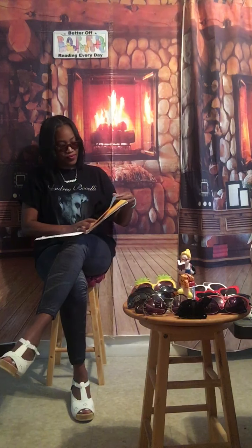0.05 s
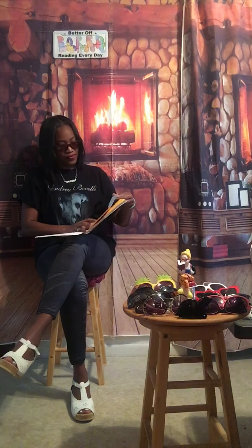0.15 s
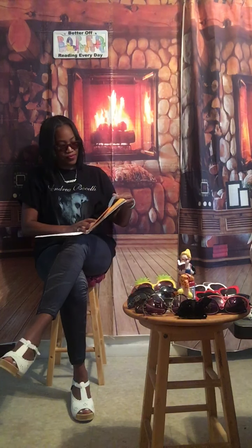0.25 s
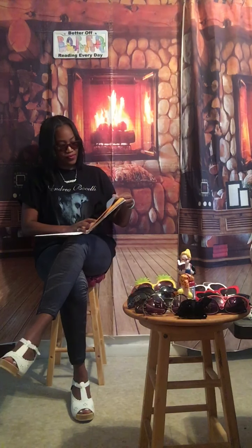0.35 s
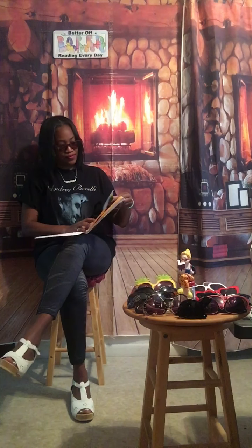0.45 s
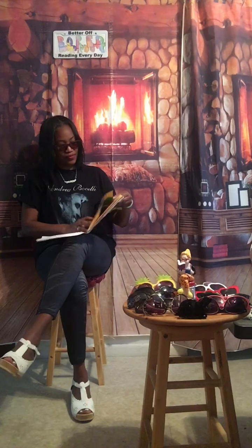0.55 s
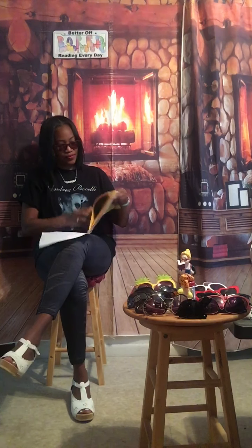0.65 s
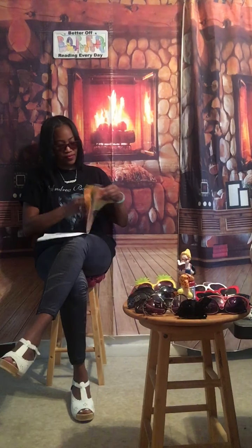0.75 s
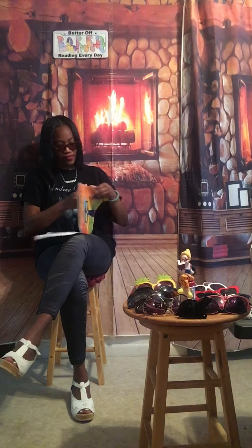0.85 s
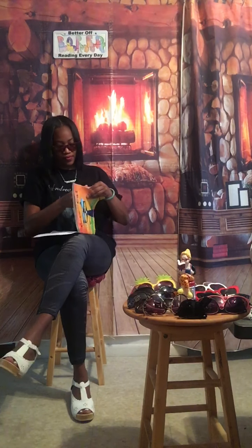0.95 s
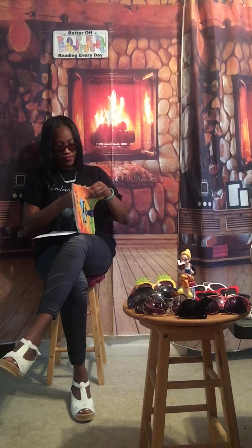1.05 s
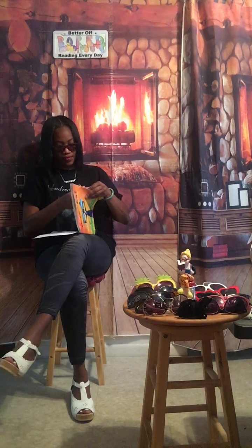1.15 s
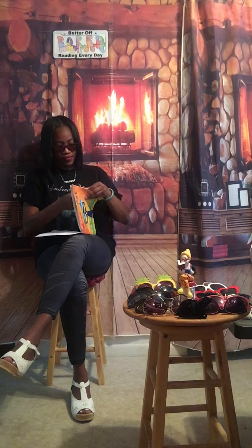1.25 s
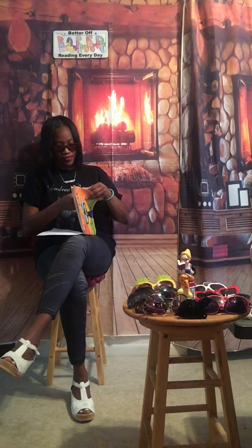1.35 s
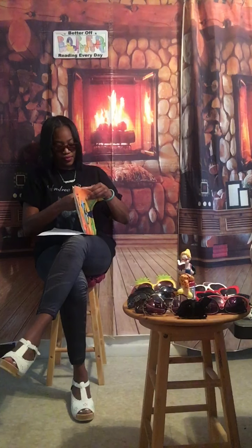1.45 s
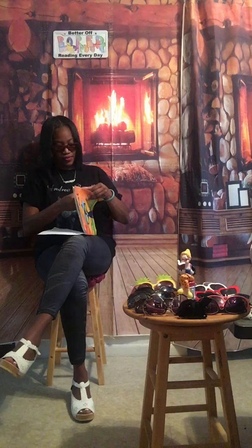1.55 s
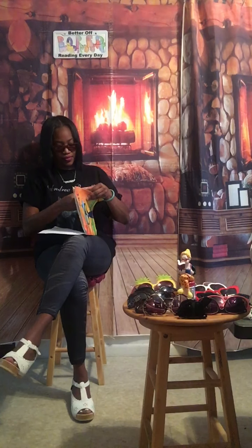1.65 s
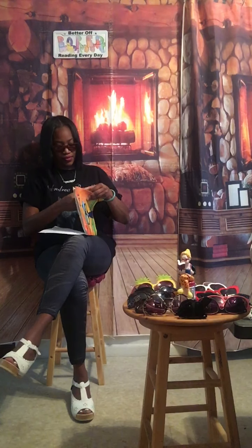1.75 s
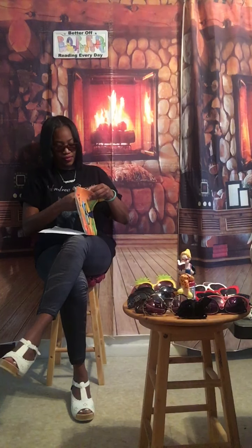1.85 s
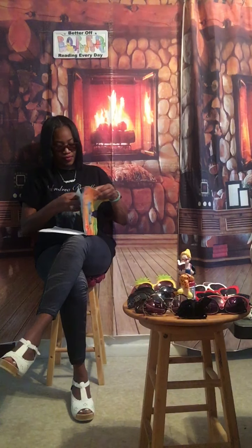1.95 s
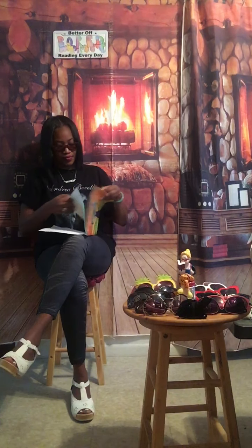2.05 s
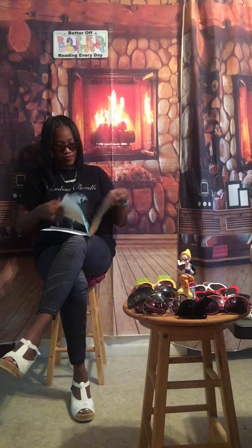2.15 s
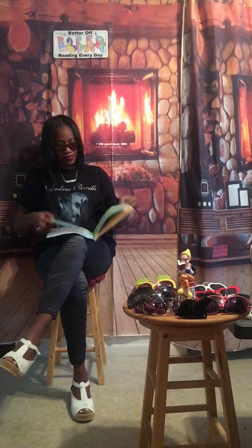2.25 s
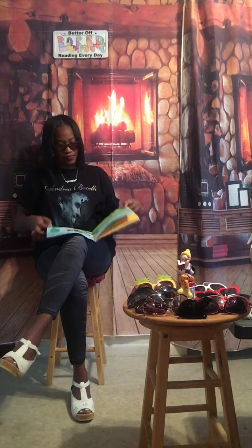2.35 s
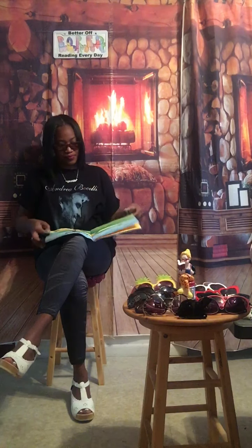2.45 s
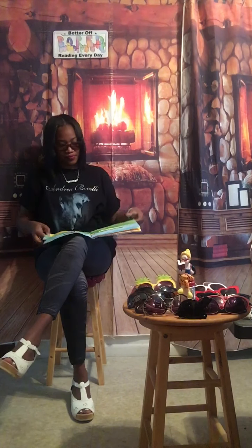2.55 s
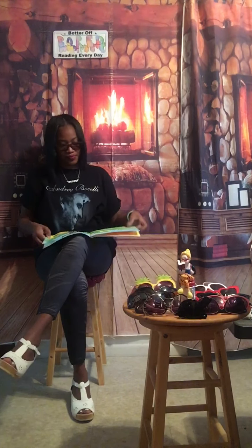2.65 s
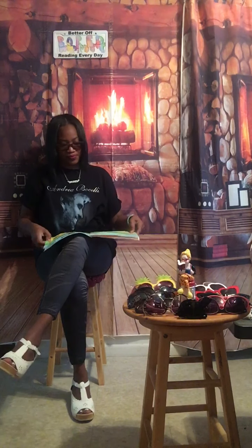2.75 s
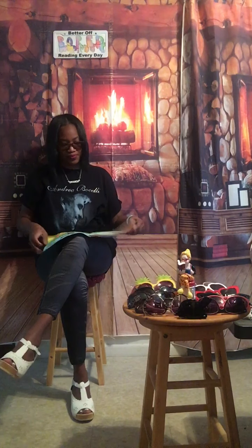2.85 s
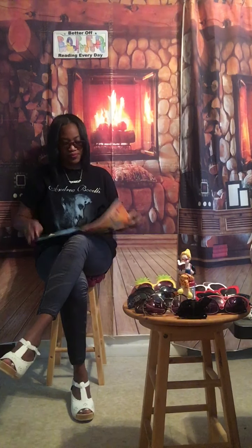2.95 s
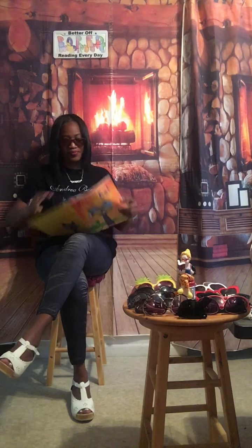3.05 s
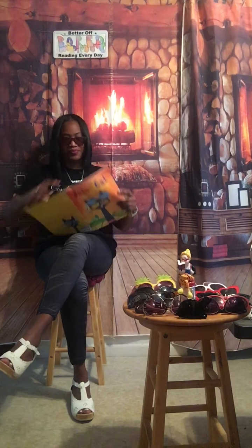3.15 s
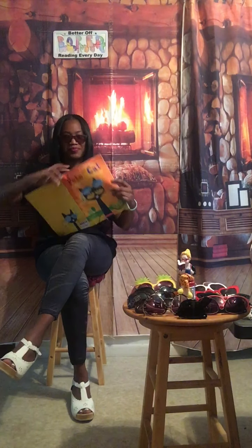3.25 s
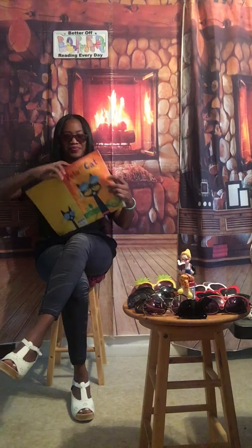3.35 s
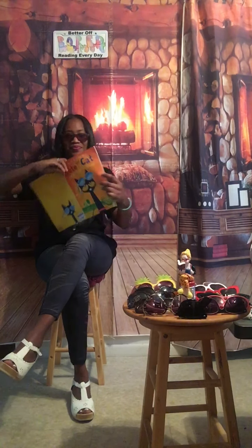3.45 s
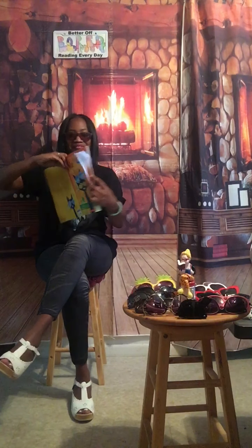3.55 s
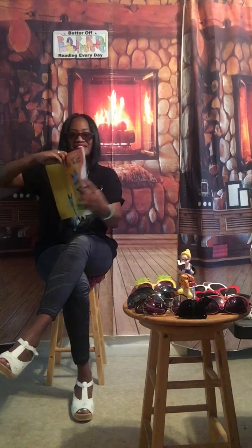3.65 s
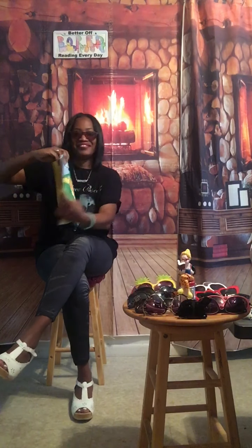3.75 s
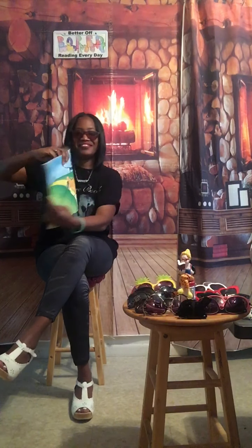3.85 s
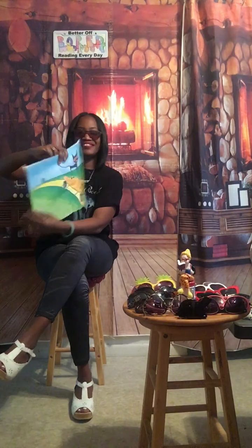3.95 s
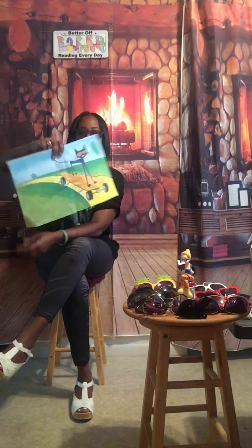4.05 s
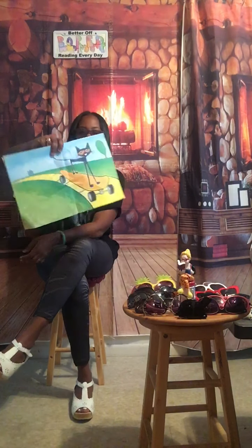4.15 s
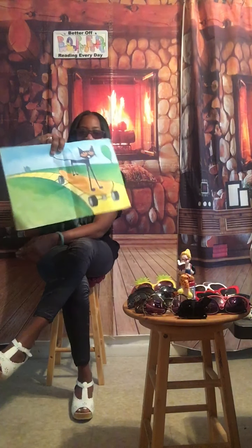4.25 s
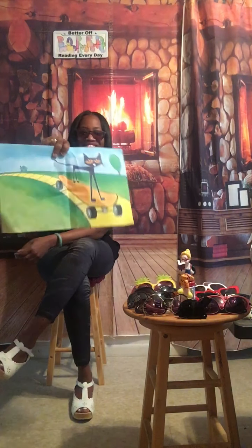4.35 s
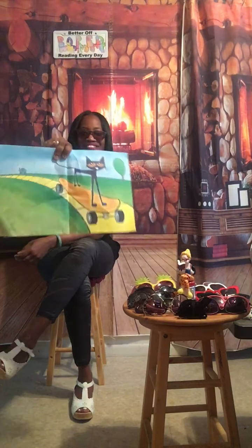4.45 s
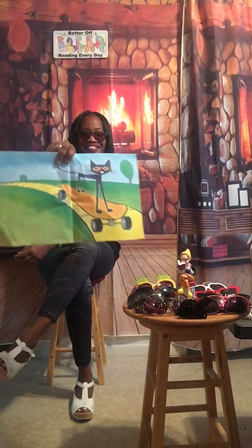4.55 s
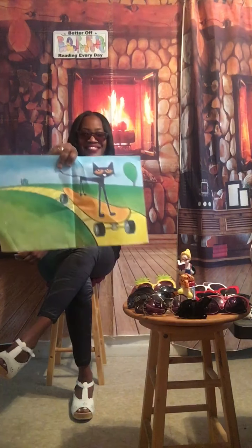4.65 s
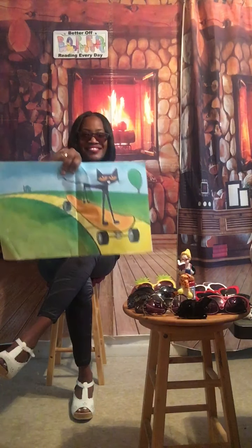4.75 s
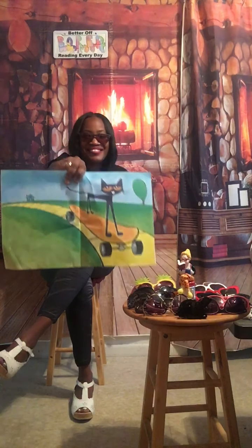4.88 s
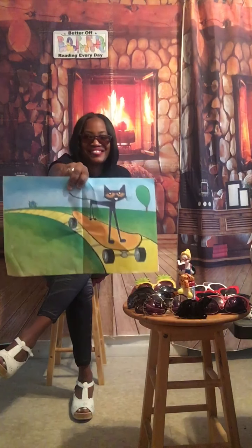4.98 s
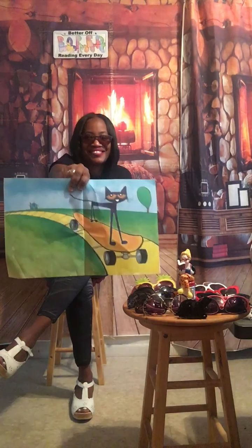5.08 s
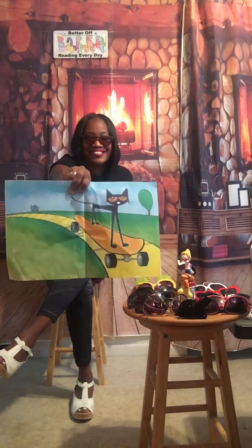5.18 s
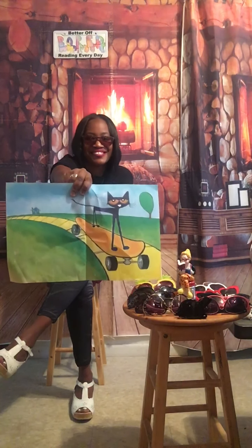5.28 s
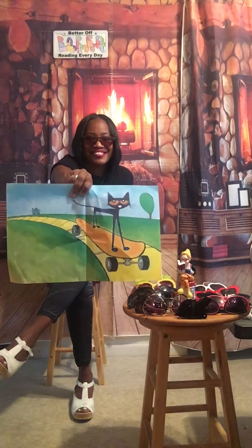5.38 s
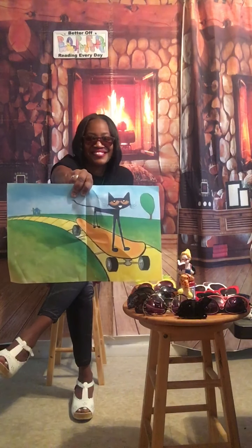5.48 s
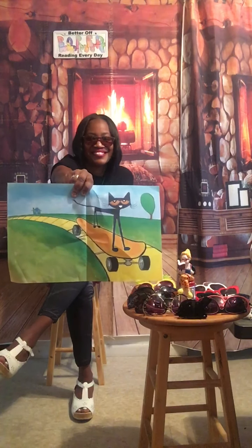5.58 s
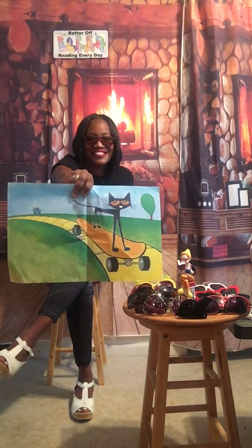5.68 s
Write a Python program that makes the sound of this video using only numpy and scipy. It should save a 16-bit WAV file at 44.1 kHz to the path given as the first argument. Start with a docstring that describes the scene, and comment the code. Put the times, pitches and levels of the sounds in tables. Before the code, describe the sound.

A large picture book is leafed through and handled in a small quiet room. Sheets slide with a soft, grainy rustle and buckle in short, crisp snaps. After a brief lull, a busier run of flicks and flops follows, then more sliding and light knocks of the cover as the book is folded open. The handling stops, leaving the low ventilation rumble, electrical hum and faint hiss that the microphone picks up throughout.

```python
"""A large picture book is leafed through, spread on the lap and folded open to be held up.
Sheets slide with a grainy rustle, buckle in short snaps and flop against the cover, which thuds.
Both rustle and snaps are swarms of tiny fibre slips. The walls of a small quiet room answer briefly;
ventilation rumble, mains hum and a faint hiss of air lie underneath."""
import sys
import numpy as np
from scipy import signal
from scipy.fft import rfft, irfft
from scipy.io import wavfile

SR = 44100
rng = np.random.default_rng(int(sys.argv[2]) if len(sys.argv) > 2 else 0)


def dump(signal):
    """Clip the signal to [-1, 1] and save it as 16-bit WAV at the path in sys.argv[1]."""
    limited = np.clip(np.atleast_2d(signal).T, -1, 1)
    pcm = np.round(limited * 32767).astype(np.int16)
    wavfile.write(sys.argv[1], SR, pcm)


N = 252242
T = np.arange(N) / SR


def undb(db):
    """Decibels to gain."""
    return 10 ** (np.asarray(db) / 20)


def unit(x):
    """Scale to rms 1."""
    return x / np.sqrt(np.mean(x ** 2))


def bins_hz(size):
    """FFT bin frequencies, floored at 1 Hz."""
    return np.maximum(np.arange(size // 2 + 1) * SR / size, 1)


def on_log_axis(points, hz):
    """Interpolate (Hz, value) points over log frequency."""
    points_hz, values = np.transpose(points)
    return np.interp(np.log(hz), np.log(points_hz), values)


def colour(x, spectrum):
    """Filter by (Hz, dB) points; rms 1."""
    return unit(irfft(rfft(x) * undb(on_log_axis(spectrum, bins_hz(N))), N))


def gain_curve(levels):
    """(s, dB) points to gain per sample."""
    return undb(np.interp(T, *np.transpose(levels)))


def drift(rate_hz):
    """Random drift with a spread near 1."""
    return np.interp(T * rate_hz, np.arange(2048), rng.standard_normal(2048))


def ventilation():
    """Ventilation rumbles in the low room modes."""
    # Rumble spectrum. Each row: frequency in Hz, relative level in dB.
    spectrum = [(25, -36), (44, -20), (58.5, 10.5), (66, -12), (71.5, 3), (74, 13.5), (77.5, 8), (84, -6.5),
                (93, -7), (103, 0), (114, -24), (150, -46)]
    # Rumble loudness. Each row: time in seconds, level in dB.
    levels = [(0.0, -55.5), (0.17, -54.5), (0.86, -60.5), (1.16, -56), (1.97, -63), (2.53, -53),
              (2.85, -60.5), (3.18, -57.5), (3.22, -60.5), (4.08, -57.5), (4.51, -58.5), (4.7, -56.5),
              (5.45, -62.5), (5.72, -59)]
    return gain_curve(levels) * colour(rng.standard_normal(N), spectrum)


def air_hiss(level_db=-67):
    """Faint steady hiss of the air."""
    # Noise floor. Each row: frequency in Hz, relative level in dB.
    spectrum = [(50, -18.5), (133, -15), (170, -21), (320, -20.5), (480, -25.5), (800, -30.5),
                (1150, -29.5), (2000, -33.5), (3100, -34.5), (4400, -37), (4800, -46), (5500, -38.5),
                (7000, -42.5), (7700, -50), (9500, -48), (10400, -62), (11500, -53), (15500, -72)]
    return undb(level_db) * colour(rng.standard_normal(N), spectrum)


def motor_hum(waver_db=3.0, beat_hz=2.3, beat_dip_s=5.14, second_db=-6.5):
    """A motor hums on the mains harmonics; a second, slightly slower, beats against its lowest line."""
    # Hum lines. Each row: frequency in Hz, relative level in dB.
    lines = [(119.8, 2.5), (239.6, -19), (359.4, -18), (408.8, -39), (479.2, -29), (958.4, -25.5)]
    # Hum loudness. Each row: time in seconds, level in dB.
    levels = [(0, -55), (.28, -57), (.6, -61.5), (2.5, -63.5), (2.9, -60), (5.72, -60)]
    rad_per_hz = 2 * np.pi * (T - beat_dip_s)
    first = sum(undb(db) * np.sin(hz * rad_per_hz) * undb(waver_db * drift(22)) for hz, db in lines)
    second = -np.sqrt(2) * np.sin((lines[0][0] - beat_hz) * rad_per_hz)
    return gain_curve(levels) * unit(unit(first) + undb(second_db) * second)


def fibre_slips(per_s, spread_db, size=N):
    """Paper fibres slip at random moments: many faint impulses, a few strong."""
    happens = rng.random(size) < per_s / SR
    strength = undb(spread_db * np.minimum(rng.exponential(size=size), 4))
    return happens * rng.choice([-1, 1], size) * strength


def slip_click(size=1024):
    """Click of one paper slip, coloured by the microphone's treble dips."""
    # Click spectrum, microphone dips included. Each row: frequency in Hz, gain in dB.
    spectrum = [(110, -22.5), (310, -6), (620, -1.5), (810, -3), (1250, 1.5), (3100, 1.5), (4650, -0.5),
                (6100, -0.5), (7700, -7.5), (9400, -4), (10400, -10.5), (12400, -4), (15900, 4)]
    cepstrum = irfft(np.log(undb(on_log_axis(spectrum, bins_hz(size)))))
    cepstrum[1:size // 2] *= 2  # fold to minimum phase
    cepstrum[size // 2 + 1:] = 0
    return irfft(np.exp(rfft(cepstrum)))


def ring(x, hz, q):
    """One damped resonance; rms 1."""
    return unit(signal.lfilter(*signal.iirpeak(hz, q, fs=SR), x))


def snap(crumple_ms, edge_hz, sheet_hz, cover_hz, cover_db, sheet_db=-4.0, size=8192):
    """A sheet buckles: an avalanche of slips swells and dies, ringing the sheet and the cover."""
    age = 1000 * np.arange(size) / SR / crumple_ms  # in crumpling times
    swell = np.minimum((age + 0.014) / 0.19, 1)
    burst = fibre_slips(per_s=14000, spread_db=1.6, size=size) * swell * np.exp(-age)
    crack = signal.fftconvolve(burst, slip_click())[:size]
    crack = unit(signal.lfilter(*signal.butter(3, edge_hz, fs=SR), crack))
    sheet = undb(sheet_db) * ring(crack, sheet_hz, q=3.5)
    cover = undb(cover_db) * ring(crack, cover_hz, q=5.5)
    return unit(crack + sheet + cover) * np.sqrt(0.004 * SR / size)  # energy of 4 ms at rms 1


def page_snaps():
    """Pages snap, flop and tap against the cover."""
    # Snaps. Each row: start in seconds, level in dB, crumpling time in ms, treble edge in Hz,
    # sheet resonance in Hz, cover resonance in Hz, cover level in dB re the crack.
    events = [ (0.3103, -54, 5.3, 2310, 2030, 306, -6), (0.459, -55, 16, 7540, 2800, 410, -18),
              (0.4863, -49.5, 20, 2670, 2030, 460, -30), (0.5626, -53.5, 9.4, 6400, 1690, 520, -20),
              (0.7763, -33, 5.6, 5600, 2300, 480, -34), (1.775, -55, 5.6, 1960, 1180, 420, -30),
              (1.8289, -33.5, 15.5, 10100, 1980, 420, -26), (1.9682, -43, 3.7, 3900, 2260, 530, -20),
              (2.04, -33, 3.5, 8600, 1820, 515, -24), (2.0449, -33, 4.5, 9900, 1270, 525, -11),
              (2.2087, -35.5, 12.5, 2750, 1330, 470, -18), (2.2430, -32, 10.2, 1690, 1170, 600, -3),
              (2.2560, -34.5, 7.3, 1910, 1100, 577, -17), (2.2618, -39, 2.8, 6160, 2600, 650, -9),
              (2.341, -42, 12, 5700, 2700, 626, -1), (2.3660, -38, 24, 3320, 1720, 600, 8),
              (2.4411, -47, 5.2, 2100, 1320, 605, 3), (2.8174, -38, 14, 4440, 2490, 610, -6),
              (2.9149, -48.5, 1.9, 3530, 2100, 516, -9), (3.1016, -40, 1.3, 3200, 1690, 440, 3),
              (3.104, -37, 1.1, 2100, 1050, 440, -17), (3.3681, -46.5, 2.7, 7000, 1800, 417, 7),
              (3.5039, -41.5, 6, 3080, 1860, 463, -7), (3.6894, -44, 3.5, 1900, 1380, 445, -14),
              (3.8922, -45, 5, 3000, 1180, 420, -26), (3.9443, -40.5, 16, 3120, 1170, 460, -2),
              (4.0035, -33, 6.6, 4020, 1090, 324, -0.5), (4.4325, -64.5, 5.4, 1000, 810, 710, 1),
              (4.537, -47.5, 5.5, 3300, 1810, 254, -2), ]
    track = np.zeros(2 * N)
    for start_s, level_db, *timbre in events:
        sound = undb(level_db) * snap(*timbre)
        start = int(start_s * SR)
        track[start:start + len(sound)] += sound
    return track[:N]


def hand_stroke(start_s, length_s, swell_db, attack_s=0.02, release_s=0.024):
    """Envelope of one push: the sheet gets going, gains or loses speed, then coasts to rest."""
    age_s = T - start_s
    attack = np.clip(age_s / attack_s, 0, 1)
    swell = undb(swell_db * (np.clip(age_s / length_s, 0, 1) - 0.5))
    release = np.exp(-np.maximum(age_s - length_s, 0) / release_s)
    return attack * swell * release


def page_slides(catch_db=1.94):
    """Paper drags over paper, catching and letting go; the same slips rustle, hiss and shake the cover."""
    # Spectra of rustle, hiss and cover rub. Each row: frequency in Hz, relative level in dB.
    rustle_spectrum = [(250, -23), (730, -6), (1250, 4.5), (2050, 3.5), (3250, 1.5), (4600, -14),
                       (6100, -12), (8000, -27), (15000, -34)]
    hiss_spectrum = [(1600, -48), (4100, 7), (6100, 2.5), (7600, -2.5), (9300, -4.5), (10400, -11),
                     (12100, -5.5), (15900, -14)]
    rub_spectrum = [(130, 3.5), (290, 5.5), (430, 5.5), (670, -0.5), (810, -5.5), (1650, -34)]
    # Strokes of sheet over sheet. Each row: start in seconds, length in seconds, mid-stroke levels
    # of rustle, hiss and cover rub in dB, swell from start to end in dB.
    strokes = [ (0.369, 0.2, -68.5, -89, -79, 9.5), (.555, 0.063, -57.5, -70.5, -67, -2),
               (0.638, .17, -55.5, -64.5, -78, 7), (0.818, 0.26, -67.5, -77.5, -73.5, -14),
               (1.107, .23, -70, -79, -79, 3), (1.359, .12, -72.5, -84, -79, 6.5),
               (1.508, .19, -78.5, -92, -78.5, 3), (1.783, 0.047, -64, -73, -73, 12),
               (1.926, 0.11, -58, -87, -69, -4), (2.134, 0.049, -67, -78, -73, -2),
               (2.201, 0.21, -52, -75.5, -62.5, -5), (2.439, 0.29, -69.5, -75.5, -78, 15),
               (2.752, 0.12, -56.5, -61, -65.5, -1), (2.91, .37, -63.5, -69.5, -69.5, -0.5),
               (3.38, 0.033, -58, -63.5, -71, -1), (3.437, 0.4, -62, -70, -76.5, -3),
               (3.819, 0.22, -58.5, -64.5, -65.5, 8), (4.135, 0.13, -72, -100, -66, -12), ]
    slips = fibre_slips(per_s=4000, spread_db=1.0) * undb(catch_db * drift(50))
    rustle = colour(slips, rustle_spectrum)
    hiss = colour(slips, hiss_spectrum)
    rub = colour(slips, rub_spectrum)
    track = np.zeros(N)
    for start_s, length_s, rustle_db, hiss_db, rub_db, swell_db in strokes:
        friction = undb(rustle_db) * rustle + undb(hiss_db) * hiss + undb(rub_db) * rub
        track += hand_stroke(start_s, length_s, swell_db) * friction
    return track


def wall_echoes(build_s=0.0027, mode_t60_s=0.2, size=22050):
    """Impulse response of near walls for one spot: a short dense tail and a few ringing modes."""
    # Room decay. Each row: band centre in Hz, time to fall 60 dB in seconds.
    bands = [(205, 0.16), (610, 0.3), (1520, 0.22), (4050, 0.22), (10100, 0.2)]
    # Room modes. Each row: frequency in Hz, level in dB re the dense tail.
    modes = [(358, -20), (677, -20), (960, -19.5), (1228, -45)]
    t = np.arange(size) / SR
    centres_hz, t60s_s = np.transpose(bands)
    noise_bins = rfft(rng.standard_normal(size))
    tail = 0
    for t60_s, weights in zip(t60s_s, np.eye(len(bands))):
        band_gain = on_log_axis(list(zip(centres_hz, weights)), bins_hz(size))
        tail += irfft(noise_bins * band_gain, size) * undb(-60 * t / t60_s)
    tail = unit(tail * (1 - np.exp(-t / build_s)))
    for hz, db in modes:
        tail += undb(db) * unit(np.cos(2 * np.pi * hz * t) * undb(-60 * t / mode_t60_s))
    return tail / np.sqrt(size)


def room(x, wet_db=-2.12, wander_hz=90, spots=5):
    """Direct sound plus echoes; the sounding spot wanders over the pages, each with its own echoes."""
    shares = np.array([drift(wander_hz) for _ in range(spots)])
    shares /= np.sqrt(np.sum(shares ** 2, axis=0))  # constant total power
    wet = sum(signal.oaconvolve(x * share, wall_echoes())[:N] for share in shares)
    return x + undb(wet_db) * wet


def scene():
    """The book in its room over the background; mono."""
    book = room(page_snaps() + page_slides())
    background = ventilation() + air_hiss() + motor_hum()
    return (book + background)[None]


def record(dry, top_hz=15700):
    """A steep low-pass cuts the top treble."""
    return signal.sosfilt(signal.ellip(10, 0.2, 70, top_hz, fs=SR, output="sos"), dry)


dry = scene()
out = record(dry)
dump(out)
```